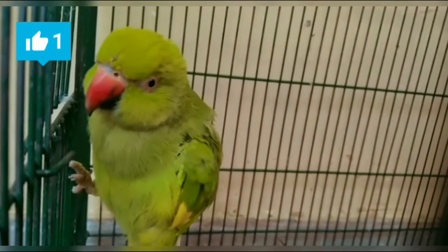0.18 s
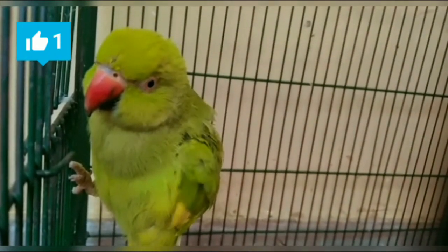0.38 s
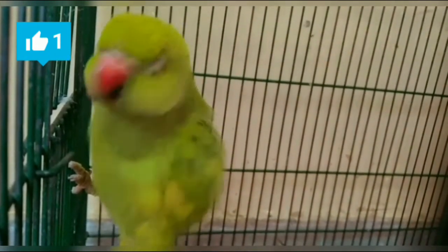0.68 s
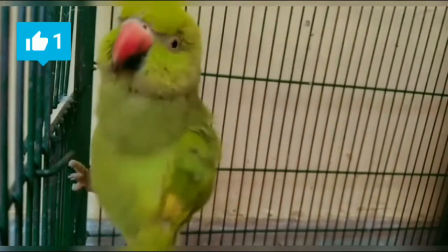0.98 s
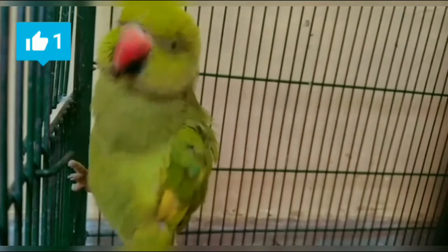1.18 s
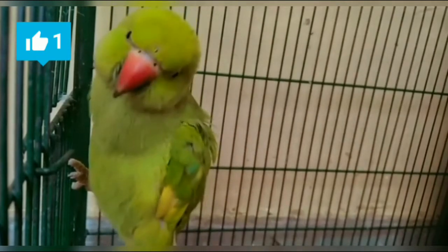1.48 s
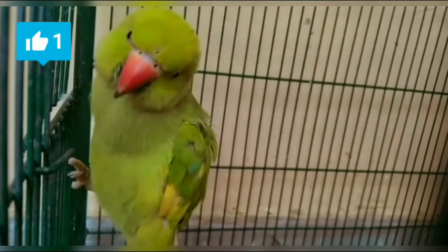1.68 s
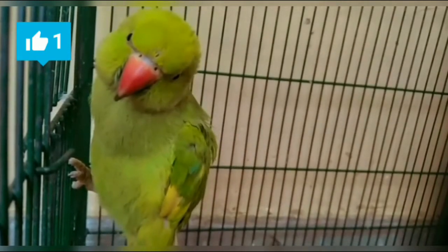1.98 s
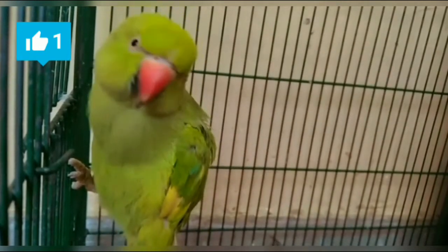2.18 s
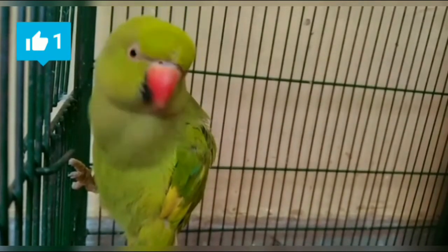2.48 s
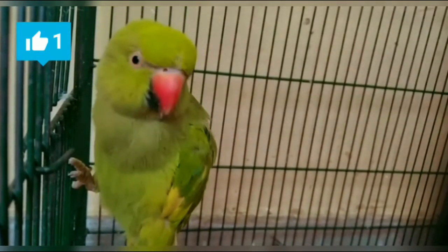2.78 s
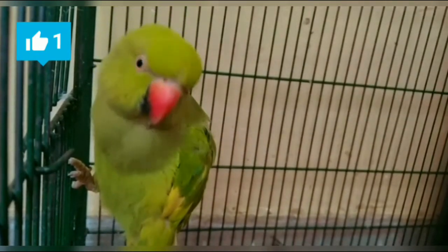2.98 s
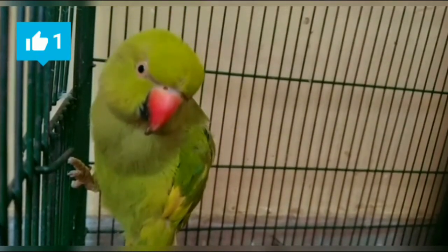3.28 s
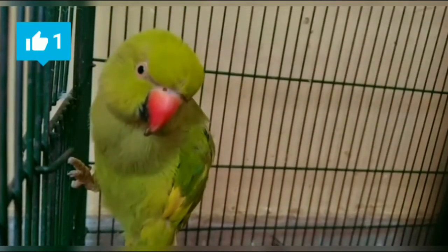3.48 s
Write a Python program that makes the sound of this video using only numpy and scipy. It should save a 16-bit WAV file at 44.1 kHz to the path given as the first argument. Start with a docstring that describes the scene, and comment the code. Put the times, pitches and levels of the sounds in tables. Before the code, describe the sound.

Loud, harsh parakeet calls up close: a wail, quick squawks, a descending cry, later soft round pips. Behind them a second bird twitters in thin gliding whistles, reverberant indoors, over low rumble and sparse dry clicks.

```python
"""Over a low room rumble, a parakeet close by in its cage opens with a long nasal wail.
Four short squawks and a falling cry follow, then five soft pips; pulses and rasping air ring its throat.
Throughout, a small songbird farther off in the echoing room trills, tweets, slurs and chirps in gliding whistles.
Ticks from the cage bars, short bursts of filtered noise, dot the second half of the calls and the pips."""
import sys
import numpy as np
from scipy import signal
from scipy.fft import rfft, irfft
from scipy.io import wavfile
from scipy.ndimage import uniform_filter1d, map_coordinates

SR = 44100
rng = np.random.default_rng(int(sys.argv[2]) if len(sys.argv) > 2 else 0)


def to_wav(sig):
    """Store sig (one row per channel, or 1-D mono) as 16-bit WAV at the path in sys.argv[1].

    Samples outside -1..1 are clipped; the rate is SR.
    """
    pcm = np.clip(np.atleast_2d(sig), -1, 1) * 32767
    pcm = np.round(pcm).astype(np.int16)
    wavfile.write(sys.argv[1], SR, pcm.T)  # frames by channels


N = 158760  # 3.6 s

# steady room noise, shape only (f/Hz, relative level per Hz/dB)
FLOOR_SPECTRUM = [(25, -22), (58, -1.5), (85, -8), (130, 3.5), (240, -13), (320, -5), (480, -14), (900, -8),
                  (3000, -19), (6000, -32), (9000, -40), (15500, -42)]
# reverberation (f/Hz, t60/s)
ROOM_T60 = [(300, 3.5), (1200, 0.34), (2400, 2.28), (3600, 0.77), (5200, 1.47), (7500, 1.36), (12000, 0.14)]
# colour of the reverb tail (f/Hz, gain/dB)
ROOM_COLOUR = [(1500, -3.5), (5000, 3), (7000, 2), (10000, 5.5)]
# cage ticks (t/s, level before the band filter/dB, lowest f/Hz, highest f/Hz, decay/s)
TICKS = [(1.05, -11, 10940, 16100, .0005), (1.355, -14, 5930, 16000, .0003),
         (2.4512, -2.5, 149, 2000, 0.00076), (2.833, -42, 8940, 14000, .001)]

# songbird's stock chirp (t from its start/s, f/Hz, level relative to its CHIRPS row/dB)
CHIRP = [(0, 3816, -29), (.004, 4390, -11), (.008, 4845, -16.5), (.011, 4374, -4), (.0135, 3933, -1.5),
         (.022, 3380, -1.5), (.033, 2950, -4), (.039, 2603, -10.5), (.046, 1820, -20.5)]
# chirp starts (t/s, level/dB, L-R/dB)
CHIRPS = [(2.224, -13.5, -5), (2.362, -13, -5.5), (2.498, -12.5, -4.5), (2.629, -13, -6.5),
          (2.762, -14, -5.5)]
# light tweet (t from its start/s, f/Hz, level relative to TWEET_DB/dB)
TWEET = [(0, 3910, -22), (.005, 5320, -12), (.008, 3726, -14), (.014, 5252, -11), (.020, 4150, -3),
         (.026, 3783, -5), (.033, 3570, -18)]
# tweet starts (t/s)
TWEETS = [1.122, 1.196, 1.264, 1.337, 1.407, 1.475, 1.55]
# thin zigzag before a chirp (t from its start/s, f/Hz, level relative to ZIGZAG_DB/dB)
ZIGZAG = [(0, 4130, -9), (.004, 6320, -3), (.009, 4180, -8.5), (.016, 6336, -7.5), (.021, 4040, 1),
          (.026, 5370, -6.5), (.035, 5570, -9)]
# zigzag starts (t/s)
ZIGZAGS = [2.326, 2.458, 2.589, 2.723]
# faint falling stroke (t from its start/s, f/Hz, level relative to its FALLS row/dB)
FALL = [(0, 3213, -13), (.007, 2690, 0.5), (.016, 2100, -4.5)]
# falling-stroke starts (t/s, level/dB, L-R/dB)
FALLS = [(3.296, -27, -2), (3.315, -24, -2), (3.335, -26, -2), (3.358, -27.5, -2)]
# trills (t/s, length/s, start f/Hz, middle f/Hz, end f/Hz, mean rate/Hz, mean depth/Hz, level/dB, L-R/dB)
TRILLS = [ (.47, .17, 4900, 5000, 4900, 86, 550, -39, 8),
          (0.7273, 0.095, 4950, 5010, 4970, 86.5, 687, -30, 11.5),
          (0.96, 0.09, 4900, 4855, 4975, 85.9, 600, -29, 8),
          (1.507, 0.061, 4050, 4140, 4160, 117, 415, -24, -1.5),
          (1.77, 0.1, 4300, 4150, 3947, 150.3, 380, -22, -1.5),
          (1.783, 0.059, 6400, 5920, 4330, 159.2, 550, -29.5, 6),
          (2.002, 0.051, 5900, 5900, 4980, 169, 900, -29.5, 6),
          (2.04, 0.0734, 4400, 4034, 3925, 158.6, 462, -19, 0),
          (2.255, 0.031, 6400, 6100, 4770, 170, 600, -34.5, 9),
          (2.278, 0.073, 4400, 3783, 2894, 149.5, 350, -24.5, 9.5),
          (3.2227, 0.037, 4350, 4193, 4210, 76.1, 706, -20, -4)]
# smooth slurs (t/s, length/s, start f/Hz, middle f/Hz, end f/Hz, level/dB, L-R/dB)
SLURS = [ (0.885, .016, 7380, 6650, 6500, -40.5, 17), (0.909, 0.015, 6280, 6517, 7020, -28.5, 5),
         (1.852, 0.039, 3940, 3220, 2470, -28.5, 5), (1.928, 0.013, 6600, 5930, 5400, -31, 6),
         (2.073, 0.046, 3550, 3080, 2530, -30, 10), (2.181, 0.019, 3100, 3580, 3780, -18, -2.5),
         (2.865, 0.021, 2794, 2785, 3030, -22.5, -6), (2.88, 0.056, 2490, 2280, 1820, -27.5, -3),
         (3.02, .033, 5980, 4150, 4430, -29, -6), (3.052, 0.04, 3270, 3466, 2920, -15, -4),
         (3.091, 0.016, 3410, 2560, 1770, -23.5, -2), (3.183, .018, 2600, 3033, 2940, -18, -6),
         (3.2, .033, 3700, 4850, 4900, -18, -7), (3.269, .017, 3480, 3172, 2580, -17.5, -3)]

# parakeet's long wail (t/s, f/Hz, level before VOICE_DB/dB)
WAIL = [(.17, 506, -60), (.21, 560.3, -30), (.26, 691.7, -18), (.31, 740.5, -16.5), (.42, 711.4, -13.5),
        (.53, 702, -13), (.686, 641, -14), (.7, 571, -26.5)]
# first, muttered squawk (t/s, f/Hz, level before VOICE_DB/dB)
MUTTER = [(.843, 596, -41), (.855, 589, -33), (.875, 525.7, -28.5), (.897, 518, -26.5), (.92, 436, -33.5),
          (.935, 410, -43)]
# one list for each of the other squawks (t/s, f/Hz, level before VOICE_DB/dB)
SQUAWKS = [
    [(.977, 439, -48), (.984, 463, -19.5), (1.007, 590.7, -15), (1.02, 600, -12.5), (1.042, 558, -16.5),
     (1.057, 608, -13), (1.074, 501, -17.5), (1.082, 445, -24.5)],
    [(1.158, 459, -26), (1.166, 517, -15), (1.182, 577, -12.5), (1.195, 502, -14.5), (1.21, 381, -24)],
    [(1.308, 619, -36), (1.33, 688, -20), (1.345, 741.5, -15.5), (1.357, 830, -11.5), (1.369, 697, -12),
     (1.383, 544.6, -14.5), (1.393, 434, -20.5)],
]
# falling cry (t/s, f/Hz, level before VOICE_DB/dB)
CRY = [(1.533, 1285, -41), (1.545, 1215, -22), (1.59, 965, -11.5), (1.623, 828, -14.5), (1.655, 739, -16.5),
       (1.705, 684, -16.5), (1.765, 674.4, -19.5), (1.81, 722, -37)]
# hoarseness of the voice (t/s, roughness 0-1)
ROUGH = [(.62, .055), (.69, .13), (1.02, .06), (1.075, .14), (1.18, .1), (1.335, .85), (1.368, .24),
         (1.54, .06), (1.625, .16), (1.7, .11)]
# throat and beak resonances at each call's average pitch (f/Hz, relative gain/dB)
WAIL_THROAT = [(300, -7.5), (700, -8.5), (1400, -6.5), (2100, 1.5), (2750, -8), (3500, -10.5),
               (4250, -15.5), (5100, -29), (7300, -40), (9300, -11), (10500, -28), (11800, -26.5),
               (13600, -49), (15300, -36.5)]
MUTTER_THROAT = [(300, -13), (530, -9), (1080, -4), (2200, -27), (3200, -55)]
SQUAWK_THROAT = [(300, -15), (570, -14.5), (1150, -11.5), (1750, -10), (2350, -4.5), (3000, -10),
                 (4000, -23), (7800, -29.5), (9300, -13), (10600, -31), (12000, -30), (13600, -56.5),
                 (15300, -42)]
SCREECH_THROAT = [(400, -18.5), (600, -13.5), (1150, -10), (1700, -12.5), (2400, -0.5), (3000, -8),
                  (4200, -22), (5900, -14.5), (8000, -20.5), (9200, -30), (11300, -23.5), (13300, -42.5),
                  (15300, -36)]
CRY_THROAT = [(400, -39.5), (700, -6.5), (1400, -12), (2050, -1.5), (2800, -4.5), (3500, -9), (4600, -23),
              (5700, -4.5), (6700, -17.5), (8000, -10.5), (8900, -33), (12000, -39), (15300, -48)]
# balance of the calls as the parakeet turns its head (t/s, L-R/dB)
HEAD = [(.55, 4), (.67, 4), (.88, 3.5), (1.18, 5), (1.36, 3.5), (1.59, 4), (1.66, 4)]
# lean of the parakeet's treble (f/Hz, L-R/dB)
BEAM = [(2500, 0.5), (6000, 2.5), (9200, 5), (15000, 10.5)]
# pips (t of centre/s, f at centre/Hz, level/dB)
PIPS = [(2.410, 1080, -16.5), (2.639, 1097, -12.5), (2.860, 1156, -12.5), (3.089, 1317, -10),
        (3.306, 1160, -12)]
# colour of the soft hiss around each pip (f/Hz, relative gain/dB)
PUFF = [(8500, -11), (11000, 0.5), (13500, -20.5)]

# room
FLOOR_DB, FLOOR_WIDE_HZ = -42, 3000  # the noise is wide above this
VOICE_ROOM_DB, SONG_ROOM_DB, ROOM_BUILD_S = -22, -2.5, 0.014
NEAR_T60_S, VOICE_NEAR_DB, SONG_NEAR_DB = 0.16, -10, -5.5  # echoes from the cage and nearest wall
TOP_HZ = 15900
# songbird
TWEET_DB, TWEET_PAN_DB, ZIGZAG_DB, SONG_DB = -19, 9, -26, 0
NOTE_ATTACK, NOTE_RELEASE, TRILL_ATTACK = 0.16, 0.21, 0.36  # shares of a note's length
SONG_WOBBLE = 0.013  # scatter of pitch (share)
TRILL_UNEVEN, DOWNSTROKE_DB = .13, 2.5  # scatter of rate and depth (share); accent on each falling stroke
# parakeet
JITTER, SHIMMER, JITTER_HZ = 0.13, 0.68, 600  # pitch and level scatter at full roughness; its speed
RASP_DB, RASP_RISE_HZ = -4, 2000  # the rasp grows above this frequency
PULSE_SPREAD = .25  # smear of each pulse (radians times harmonic squared)
BRIGHT_HZ, BRIGHTNESS = 3000, 1.38  # above this, extra fade in dB per dB of lost effort
CHEST_HZ = 230  # the bird radiates little below this
BEAK_CLOSES_S, BEAK_CLOSING_S = 1.62, 0.08  # the falling cry turns nasal like the wail
THROAT_FOLLOW = 0.11  # the resonances go with this power of the pitch
VOICE_DB, LEAD_S = 0.3, .000036  # trim of the calls; time by which the left side leads
PIP_WIDTH_S, PIP_SAG_PER_S, PIP_PAN_DB = 0.0027, 16.9, 4  # sag is a share of pitch per second
PUFF_DB, PUFF_WIDTH_S = -24, .0045  # puff level is relative to its pip


def undb(db):
    """Decibels to gain."""
    return 10 ** (np.asarray(db) / 20)


def unit(x):
    """Scale to rms 1."""
    return x / np.sqrt(np.mean(x ** 2) + 1e-20)


def curve(t, rows, order=1):
    """One column of a table, joined by straight lines."""
    rows = np.array(rows, float)
    return np.interp(t, rows[:, 0], rows[:, order])


def over_hz(f, points):
    """A table read on a log-frequency axis."""
    p = np.array(points, float)
    return np.interp(np.log(f + 1), np.log(p[:, 0]), p[:, 1])


def butter(x, order, hz, kind="low"):
    """Causal Butterworth filter."""
    return signal.sosfilt(signal.butter(order, hz, kind, fs=SR, output="sos"), x)


def colour(x, points):
    """Causal minimum-phase filter with the given (f/Hz, gain/dB) shape."""
    size = 2 * len(x)
    cepstrum = irfft(np.log(undb(over_hz(np.fft.rfftfreq(size, 1 / SR), points))))
    # folding the cepstrum forward in time makes the filter causal
    cepstrum[1:size // 2] *= 2
    cepstrum[size // 2 + 1:] = 0
    return irfft(rfft(x, size) * np.exp(rfft(cepstrum)))[:len(x)]


def moving_colour(x, points, shift):
    """The same filter with all its frequencies scaled by a moving factor, through a warped clock."""
    clock = np.cumsum(shift)
    source_index = np.interp(np.arange(int(clock[-1])), clock, np.arange(len(x)))
    warped = map_coordinates(x, [source_index])
    return map_coordinates(colour(warped, points), [clock])


def wobble(size, hz):
    """Smooth chance with spread 1, mostly slower than hz."""
    return unit(butter(rng.standard_normal(size), 2, hz))


def span(start, end):
    """Sample times between two moments."""
    return np.arange(int(start * SR), int(end * SR)) / SR


def add(out, t, x, pan_db=0):
    """Mix a sound in at its times, with 1 ms fades at the ends and a left-right balance."""
    i = int(round(t[0] * SR))
    x = x * np.clip(np.minimum(t - t[0], t[-1] - t) / .001, 0, 1)
    out[:, i:i + len(t)] += np.array([x * undb(pan_db / 2), x * undb(-pan_db / 2)])


def floor():
    """Low room noise, nearly alike on both sides in the bass and wide in the treble."""
    mid, side = (unit(colour(rng.standard_normal(N), FLOOR_SPECTRUM)) for _ in range(2))
    side = 0.098 * side + butter(side, 1, FLOOR_WIDE_HZ, "high")
    return undb(FLOOR_DB) * np.array([mid + side, mid - side])


def room(x, far_db, near_db):
    """Quick nearby echoes and a longer tail, both decaying noise; the tail's decay differs by band."""
    t = span(0, 1.4)
    f = np.fft.rfftfreq(len(t), 1 / SR)
    out = []
    for channel in x:
        noise = rfft(rng.standard_normal(len(t))) * undb(over_hz(f, ROOM_COLOUR))
        tail = 0
        for hz, t60 in ROOM_T60:
            # overlapping triangular bands that add up to one
            band = over_hz(f, [(h, float(h == hz)) for h, _ in ROOM_T60])
            tail = tail + irfft(noise * band, len(t)) * np.exp(-np.log(1000) * t / t60)
        tail = tail * (1 - np.exp(-t / ROOM_BUILD_S)) * np.sqrt(2 * np.log(1000) / SR)
        near = rng.standard_normal(len(t)) * np.exp(-np.log(1000) * t / NEAR_T60_S) * (t > .001)
        echoes = undb(far_db) * tail + undb(near_db) * near / np.linalg.norm(near)
        out.append(channel + signal.fftconvolve(x.mean(axis=0), echoes)[:N])
    return np.array(out)


def cage():
    """Dry ticks from the bars: noise that dies away at once, limited to each tick's band."""
    out = np.zeros((2, N))
    for at, db, low_hz, high_hz, decay_s in TICKS:
        age = np.arange(N) / SR - at
        burst = rng.standard_normal(N) * np.exp(-np.abs(age) / decay_s) * (age > 0)
        out += undb(db) * butter(burst, 4, [low_hz, high_hz], "band")
    return out


def whistle(hz):
    """A pure, slightly unsteady tone with rms near 1."""
    phase = 2 * np.pi * np.cumsum(hz * (1 + SONG_WOBBLE * wobble(len(hz), 400))) / SR
    return np.sqrt(2) * np.sin(phase)


def stock_syllables(out):
    """Chirps, tweets, zigzags and falling strokes: each repeats one gliding whistle."""
    tweets = [(at, TWEET_DB, TWEET_PAN_DB) for at in TWEETS]
    zigzags = [(at, ZIGZAG_DB, 0) for at in ZIGZAGS]
    for shape, rows in ((CHIRP, CHIRPS), (TWEET, tweets), (ZIGZAG, zigzags), (FALL, FALLS)):
        for at, db, pan_db in rows:
            t = span(at, at + shape[-1][0])
            level_db = db + curve(t - at, shape, order=2)
            add(out, t, whistle(curve(t - at, shape)) * undb(level_db), pan_db)


def trills_and_slurs(out):
    """Whistles on curved glides; trills also swing unevenly in pitch, loudest on their downstrokes."""
    slurs = [(*row[:-2], 0, 0, *row[-2:]) for row in SLURS]  # no rate or depth
    for at, length, start, middle, end, rate, depth, db, pan_db in TRILLS + slurs:
        t = span(at, at + length)
        u = np.linspace(0, 1, len(t))
        hz = np.polyval(np.polyfit([0, .5, 1], [start, middle, end], 2), u)
        attack = TRILL_ATTACK if depth else NOTE_ATTACK
        swell = np.clip(np.minimum(u / attack, (1 - u) / NOTE_RELEASE), 0, 1)
        if depth:
            turn = 2 * np.pi * np.cumsum(rate * (1 + TRILL_UNEVEN * wobble(len(t), rate))) / SR
            hz = hz + depth * np.sin(turn) * (1 + TRILL_UNEVEN * wobble(len(t), rate))
            swell = swell * unit(undb(-DOWNSTROKE_DB * np.cos(turn)))
        add(out, t, whistle(hz) * swell * undb(db), pan_db)


def songbird():
    """Pure whistled song: repeated stock syllables between free slurs and uneven trills."""
    out = np.zeros((2, N))
    stock_syllables(out)
    trills_and_slurs(out)
    return out * undb(SONG_DB)


def pulses(hz):
    """Band-limited train of slightly smeared syrinx pulses at a moving pitch, from 40 harmonics."""
    phase = 2 * np.pi * np.cumsum(hz) / SR
    return sum(np.cos(k * phase - PULSE_SPREAD * k * k) * (k * hz < SR / 2) for k in range(1, 41))


def voice_source(pitch, rough):
    """Syrinx pulses, uneven in pitch and level, with a rasp of air that comes in puffs at the pitch."""
    size = len(pitch)
    hz = pitch * (1 + JITTER * rough * wobble(size, JITTER_HZ))
    voiced = unit(pulses(hz)) * (1 + SHIMMER * rough * wobble(size, JITTER_HZ))
    air = rng.standard_normal(size) * (1 + np.cos(2 * np.pi * np.cumsum(hz) / SR))
    hiss = np.gradient(air) * SR / (2 * np.pi * RASP_RISE_HZ)
    air = air + hiss * (1 - np.minimum(rough, 1)) ** 2 * 2  # a clearer voice has a brighter rasp
    return voiced + undb(RASP_DB) * rough * air


def call(out, rows, throat):
    """The source rings throat and beak, whose resonances rise with pitch; more effort is brighter."""
    t = span(rows[0][0], rows[-1][0])
    pitch, db = curve(t, rows), curve(t, rows, order=2)
    source = voice_source(pitch, curve(t, ROUGH))
    shift = (pitch / np.average(pitch, weights=undb(db))) ** THROAT_FOLLOW
    closed = np.clip((t - BEAK_CLOSES_S) / BEAK_CLOSING_S, 0, 1)
    open_voice = moving_colour(source, throat, shift)
    nasal_voice = moving_colour(source, WAIL_THROAT, shift)
    x = butter((1 - closed) * open_voice + closed * nasal_voice, 2, CHEST_HZ, "high")
    low = signal.sosfiltfilt(signal.butter(2, BRIGHT_HZ, fs=SR, output="sos"), x)
    x = low + (x - low) * undb(BRIGHTNESS * (db - db.max()))
    # even out the running level (11 ms) so the table sets it
    x = x / np.sqrt(uniform_filter1d(x ** 2, size=500) + 1e-12)
    add(out, t, x * undb(db + VOICE_DB), curve(t, HEAD))


def pips(out):
    """Sagging whistles of a few cycles under a bell-shaped swell, each in a soft puff of hiss."""
    for at, hz, db in PIPS:
        t = span(at - .02, at + .02)
        tone = whistle(hz * (1 - PIP_SAG_PER_S * (t - at))) * np.exp(-((t - at) / PIP_WIDTH_S) ** 2)
        puff = unit(colour(rng.standard_normal(len(t)), PUFF)) * np.exp(-np.abs(t - at) / PUFF_WIDTH_S)
        add(out, t, (tone + undb(PUFF_DB) * puff) * undb(db), PIP_PAN_DB)


def parakeet():
    """Wail, squawks, falling cry and pips; the treble beams to the left, which also hears it first."""
    out = np.zeros((2, N))
    call(out, WAIL, WAIL_THROAT)
    call(out, MUTTER, MUTTER_THROAT)
    for rows, throat in zip(SQUAWKS, (SQUAWK_THROAT, SCREECH_THROAT, SCREECH_THROAT)):
        call(out, rows, throat)
    call(out, CRY, CRY_THROAT)
    pips(out)
    left = colour(out[0], [(f, db / 2) for f, db in BEAM])
    right = colour(out[1], [(f, -db / 2) for f, db in BEAM])
    return np.array([left, map_coordinates(right, [np.arange(N) - LEAD_S * SR])])


def scene():
    """Room noise, the farther songbird, and the near parakeet in its cage."""
    far = room(songbird(), SONG_ROOM_DB, SONG_NEAR_DB)
    near = room(parakeet() + cage(), VOICE_ROOM_DB, VOICE_NEAR_DB)
    return floor() + far + near


def record(dry):
    """Full-scale limit, then a steep cut of the top."""
    steep = signal.ellip(10, .1, 80, TOP_HZ, fs=SR, output="sos")
    return signal.sosfilt(steep, np.clip(dry, -1, 1))


dry = scene()
out = record(dry)
to_wav(out)
```